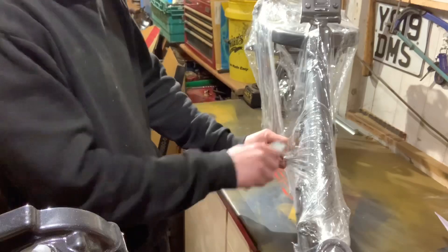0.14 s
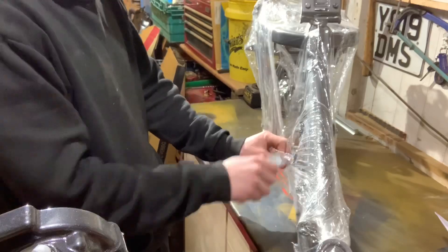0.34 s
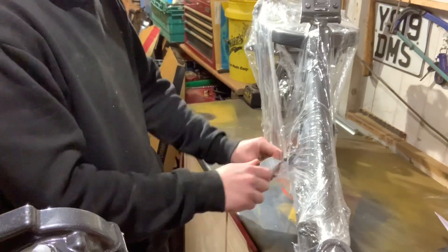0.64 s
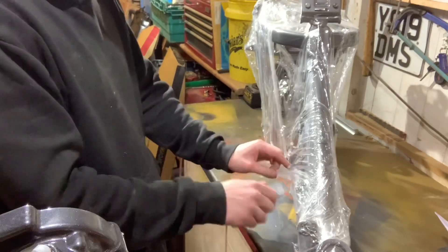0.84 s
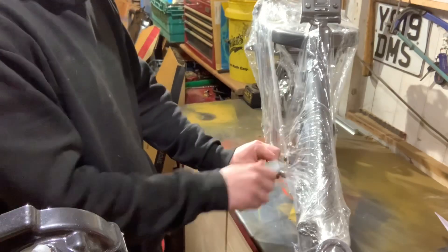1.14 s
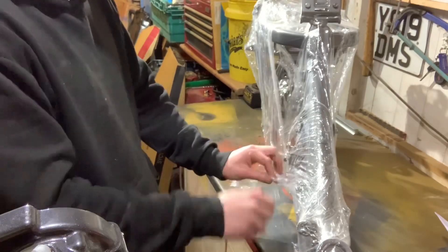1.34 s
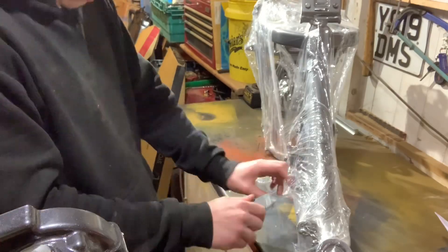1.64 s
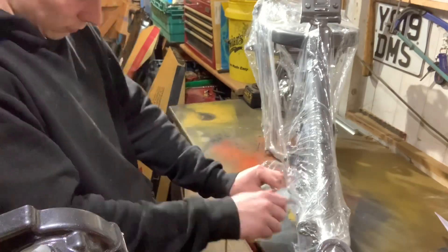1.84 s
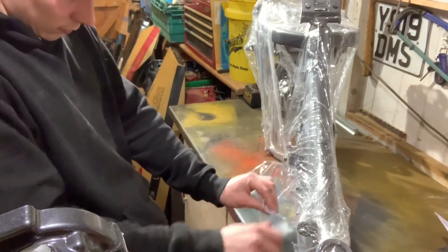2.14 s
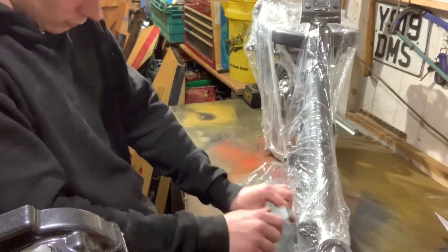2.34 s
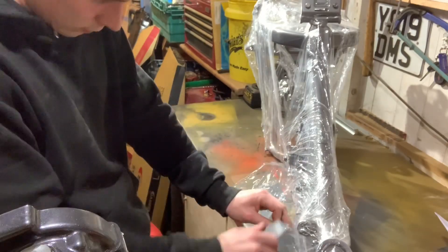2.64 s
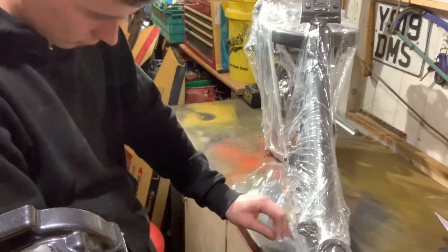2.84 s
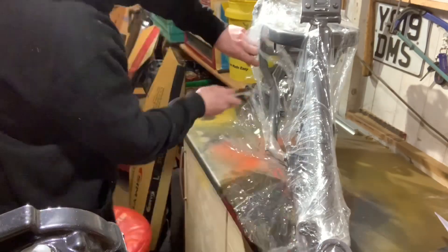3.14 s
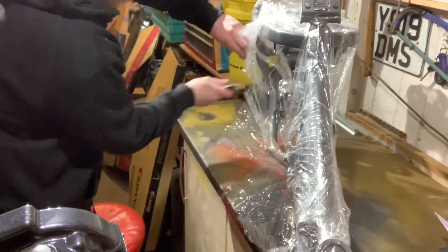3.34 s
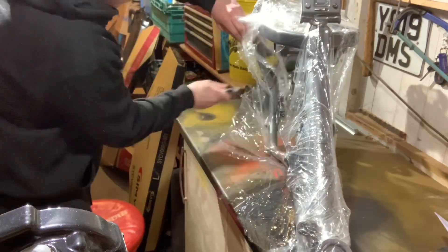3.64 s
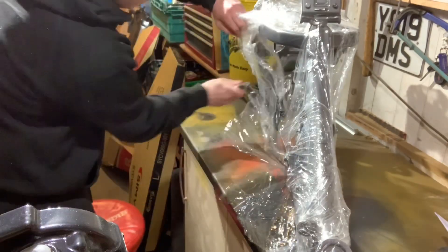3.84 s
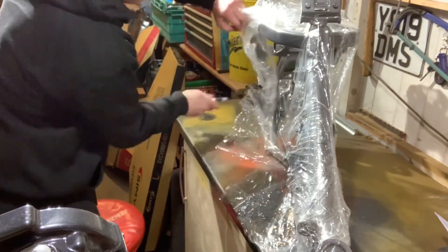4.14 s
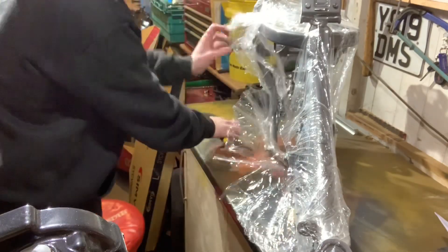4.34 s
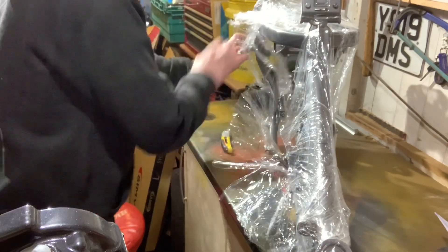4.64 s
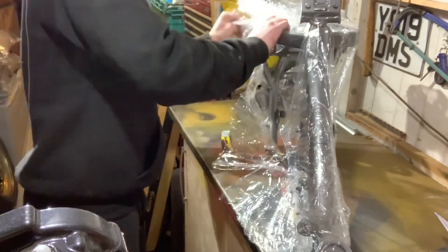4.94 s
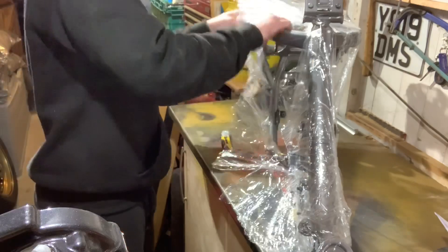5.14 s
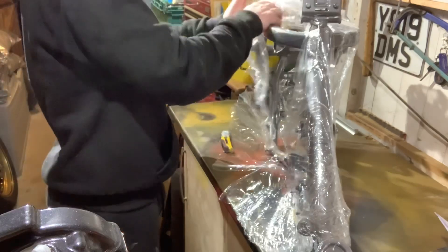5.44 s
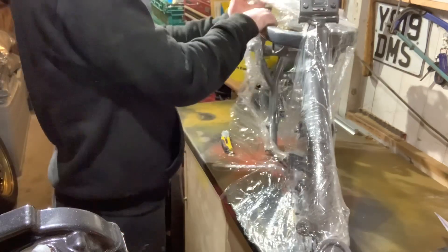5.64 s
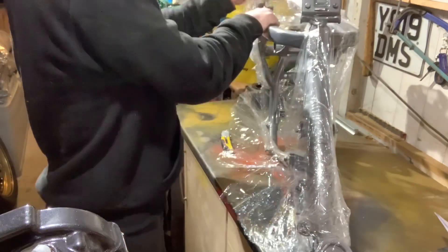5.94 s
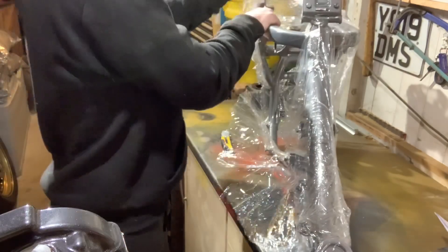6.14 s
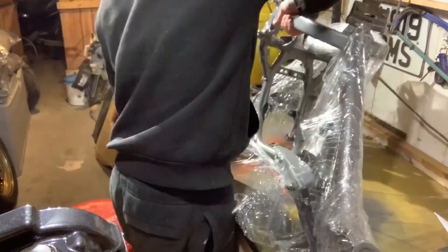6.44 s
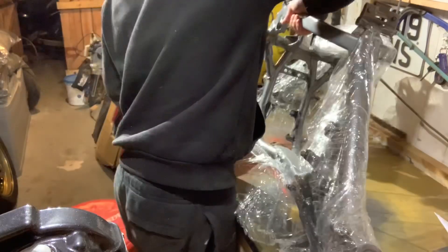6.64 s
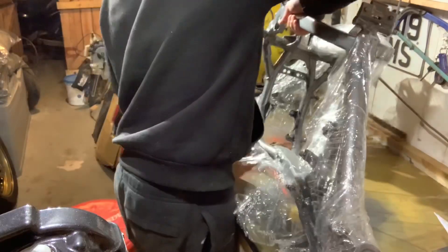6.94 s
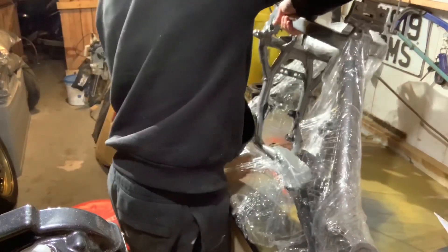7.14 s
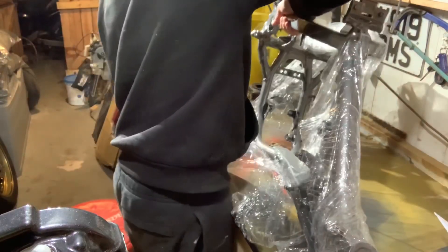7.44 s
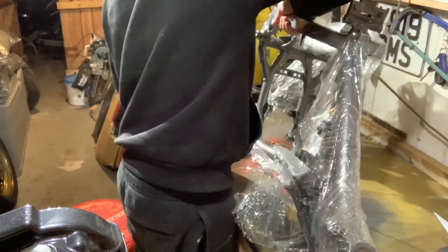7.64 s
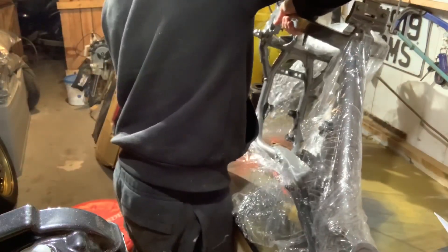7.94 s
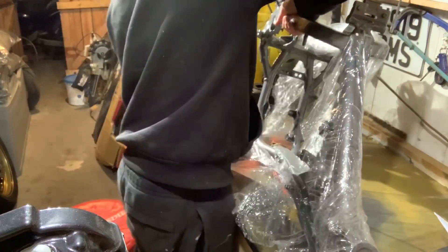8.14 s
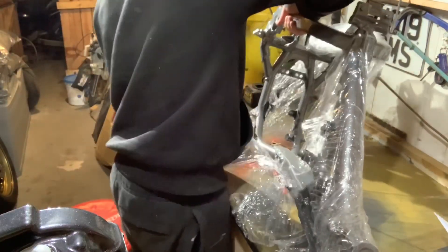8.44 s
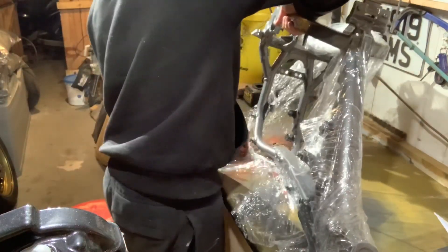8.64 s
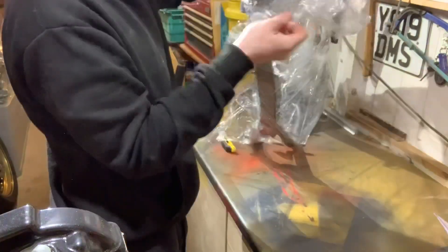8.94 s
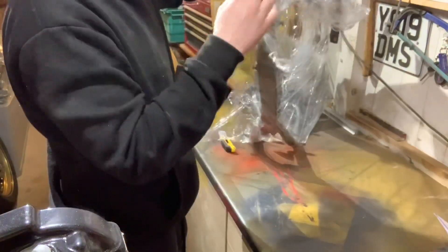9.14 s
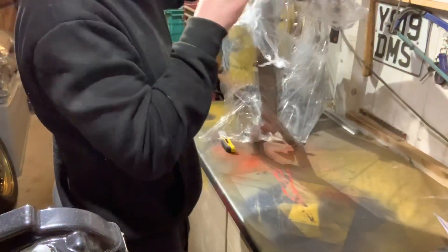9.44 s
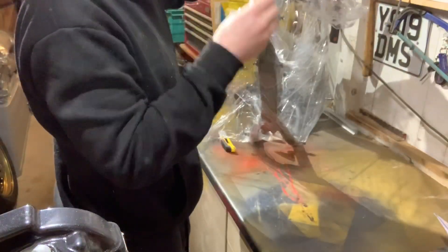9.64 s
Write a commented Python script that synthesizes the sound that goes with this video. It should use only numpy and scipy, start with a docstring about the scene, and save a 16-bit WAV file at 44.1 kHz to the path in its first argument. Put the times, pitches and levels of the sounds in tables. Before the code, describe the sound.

Plastic stretch film ticks and rips in short tugs, is popped six times by a blade, then peeled and crumpled, with one late knock.

```python
"""Stretch wrap is taken off a metal frame on a workshop bench. Short tugs first rip it in dense trains of
clicks; a knife then punctures the taut film six times, each a noise pop over a sinking membrane boom,
and is put down with a clack. Next the film is mostly peeled and crumpled, in hiss and crackle, thudding
like a slack drum, and late on one knock rings the frame as damped sines. Random paths scatter it all
off the bench and the walls of a small room."""
import sys
import numpy as np
from scipy import signal
from scipy.fft import rfft, irfft, next_fast_len
from scipy.io import wavfile
from scipy.ndimage import map_coordinates

SR = 44100
rng = np.random.default_rng(int(sys.argv[2]) if len(sys.argv) > 2 else 0)


def store_wav(level_fs):
    """Save 16-bit WAV to argv[1]."""
    pcm = np.round(np.clip(np.atleast_2d(level_fs), -1, 1) * 32767)
    wavfile.write(sys.argv[1], SR, pcm.T.astype(np.int16))


N = 431738

# All levels are relative settings within their own layer.
# Background and room tone spectrum: frequency_hz, level_db
AIR_SPECTRUM = [(30, -20.5), (110, 8), (300, -9), (900, -28), (15000, -48)]
# Reverberation of the small room: frequency_hz, t60_s
ROOM_DECAY = [(150, 0.23), (500, 0.13)]

# Spectrum of the knife handle on the bench: frequency_hz, level_db
KNIFE_SPECTRUM = [(400, 2), (750, -11.5), (2300, -1), (3500, -16.5), (15000, -30.5)]
KNIFE_S, KNIFE_DB = 4.4585, -24.5  # the knife is put down
# Ringing modes of the frame: frequency_hz, level_db, t60_s
FRAME_MODES = [(1910, -9, 0.066), (2070, 11, 0.012), (2230, -9, 0.067)]
KNOCK_S, KNOCK_DB = 8.5345, -17

# Soft thuds as the stretched sheet lets go: start_s, level_db
THUDS = [(0.715, -43), (0.866, -40), (1.685, -45), (3.767, -32.5), (4.821, -30.5), (5.173, -22),
         (5.248, -24.5), (5.362, -24.5), (5.421, -24.5), (5.587, -21), (5.684, -19), (6.026, -24),
         (6.162, -21.5), (6.831, -32.5), (7.358, -34), (7.874, -33)]
# Film squeaking under the blade or the fingers: start_s, length_s, pitch_hz, level_db
SQUEAKS = [(3.2, 0.098, 1190, -33), (3.306, 0.022, 1373, -31.5), (3.346, 0.064, 1160, -35.5),
           (6.114, 0.042, 1240, -39.5), (7.317, 0.033, 1487, -29.5)]
# Single creases snapping over: start_s, level_db
SNAPS = [(0.455, -27.5), (0.5377, -31.5), (0.562, -20.5), (1.446, -24.5), (1.796, -26.5), (2.665, -29),
         (3.397, -22.5), (4.3984, -40.5), (5.007, -17.5), (5.3345, -18), (5.3754, -19), (5.508, -24),
         (5.572, -17.5), (5.68, -16.5), (5.7872, -24.5), (6.308, -37), (6.469, -21.5), (6.519, -21),
         (6.626, -27), (6.6697, -23), (6.757, -32), (7.2342, -30), (7.324, -26), (7.34, -24), (7.874, -24),
         (8.037, -26.5), (8.366, -26), (8.4418, -36.5), (8.858, -24), (9.369, -27), (9.547, -27.5),
         (9.5797, -23)]
# Knife punctures: start_s, pop_db, drum_db, scrape_s (length of scrape before the pop), scrape_db
STABS = [(3.236, -15.5, -19, 0.013, -21.5), (3.416, -18.5, -15, 0.025, -31.5),
         (3.5649, -13.5, -14.5, 0.016, -28.5), (3.734, -21.5, -16.5, 0.019, -25),
         (3.907, -21, -17.5, 0.034, -26.5), (4.054, -18, -15.5, 0.031, -27)]
HUM_DB, HUM_T60 = -25.5, 0.33  # the sheet's hum after a boom; decay in s
# Tears: start_s, end_s, level_db, flutter_db (freed edge, re the tear)
RIPS = [(0, 0.057, -37.5, -7.5), (0.198, 0.256, -38, -10), (0.764, 0.791, -41, -13.5),
        (0.982, 1.043, -38, -7.5), (1.206, 1.272, -36, -8.5), (1.43, 1.484, -35, -7),
        (1.863, 1.905, -39, -12), (2.07, 2.143, -34.5, -11), (2.717, 2.77, -31, -20),
        (4.934, 4.965, -24.5, -16.5), (5.33, 5.395, -33, -13.5), (5.663, 5.71, -32.5, -10.5),
        (7.331, 7.368, -36.5, -4), (9.418, 9.445, -38.5, -39)]

# Light fingering between the tugs: time_s, pull_db
FINGERING = [(0.0, -70), (0.35, -67.5), (0.6, -59), (1.25, -54), (1.4, -66.5), (1.75, -58), (2.03, -65.5),
             (2.35, -55.5), (4.1, -49.5), (4.52, -70), (4.57, -44), (6.1, -43), (6.9, -51), (7.5, -51),
             (7.68, -63.5), (8.07, -45.5), (8.27, -63.5), (9.79, -49.5)]
# Tugs and handfuls that unstick the film: start_s, length_s, pull_db
TUGS = [(0.568, 0.051, -50), (0.724, 0.059, -49), (1.682, 0.057, -50.5), (1.806, 0.14, -51),
        (2.479, 0.071, -38.5), (2.682, 0.092, -44), (3.025, 0.025, -40), (3.198, 0.27, -46.5),
        (3.73, 0.076, -47.5), (4.65, 0.37, -34.5), (5.118, 0.036, -37), (5.245, 0.175, -33.5),
        (5.57, 0.21, -42.5), (5.744, 0.12, -39), (6.21, 0.13, -37), (6.44, 0.073, -40.5),
        (6.606, 0.26, -43), (7.015, 0.17, -50.5), (7.214, 0.036, -43.5), (7.339, 0.068, -43.5),
        (7.79, 0.14, -43), (8.33, 0.66, -47.5), (8.513, 0.079, -40), (8.843, 0.16, -37),
        (9.54, 0.14, -41.5)]
# The loose sheet is shaken and flaps: start_s, length_s, flutter_db
FLAPS = [(0.462, 0.0071, -41), (0.718, 0.12, -58), (7.865, 0.037, -46.5), (8.54, 0.22, -47.5),
         (8.945, 0.028, -45.5)]
ARCH_DB = 1.5  # a stroke is this much weaker at its ends than in its middle
GRIP_DB_PER_S, RELEASE_DB_PER_S = 554, 356  # how fast a stroke takes hold and lets go
# Instants when slack film almost stops crackling: time_s
SLACKS = [3.136, 4.44, 5.052, 5.462, 6.336, 6.9, 8.821]
SLACK_S, SLACK_DB = 0.012, -20  # Gaussian half length and depth of such a lull
# How much the film is bunched up: time_s, level_db (coarse crackle re pull)
BUNCHING = [(0.0, -3.5), (3.3, -6), (4.7, -10), (5.8, -11.5), (6.6, 0), (7.9, -2.5), (8.71, -4),
            (9.79, -11.5)]
FLUTTER_DB = -19  # flutter that goes with any pull, re the pull
PEEL_DB = -36.5  # pull at which crackling and even peel share equally

# Spectra of the film's sounds, each: frequency_hz, level_db
# sharp crack of a crease or tear
CRACK = [(150, -16), (500, -7), (720, -14.5), (1000, -10), (1250, -2.5), (2900, -0.5), (3400, -5),
         (4700, -4.5), (15500, -9.5)]
# puncture of taut film
POP = [(740, -7.5), (1000, -1.5), (2700, 0), (15500, -12)]
# fine unsticking
SIZZLE = [(300, -28), (900, -10), (3300, 2), (15500, -0.5)]
# even peeling
PEEL = [(550, -3), (730, -8.5), (900, -1.5), (15500, 2)]
# coarse folds
CRUMPLE = [(900, -34), (1350, -4.5), (1650, -6.5), (2050, 0), (2750, -7.5), (3400, -15.5), (7000, -34.5)]
# flapping sheet or edge
FLUTTER = [(50, -25.5), (150, -2.5), (250, -7), (340, 3), (420, -4.5), (510, 1), (720, -15), (1500, -51)]
# low movement of the whole sheet
SWAY = [(45, -35), (100, 0), (135, 3), (190, -7), (500, -32.5)]
TOP_HZ = 16050  # upper band limit of the output


def amp(db):
    """Level to amplitude: 20 dB is a factor of ten."""
    return 10 ** (np.asarray(db) / 20)


def unit(x):
    """Normalisation of power: x at rms 1."""
    return x / np.sqrt(np.mean(x ** 2) + 1e-20)


def along(points, hz):
    """Interpolation of a frequency curve on a logarithmic axis."""
    f, v = np.transpose(points)
    return np.interp(np.log(hz + 1), np.log(f), v)


def gains(rows):
    """Envelopes linear in decibels: one gain per sample for each dB column, -120 dB outside the rows."""
    s, *cols = np.transpose(rows)
    t = np.arange(N) / SR
    return [amp(np.interp(t, s, c, -120, -120)) for c in cols]


def wobble(rate):
    """Slow random modulation: random knots, rate per second, joined by straight lines at rms 1."""
    knots = rng.standard_normal(int(N * rate / SR) + 4)
    return unit(map_coordinates(knots, [np.arange(N) * rate / SR], order=1))


def add(track, s, sound):
    """Superposition: mix a sound into a track from time s."""
    part = track[..., round(s * SR):][..., :sound.shape[-1]]
    part += sound[..., :part.shape[-1]]


def colour(x, spectrum, size=4096):
    """Minimum-phase filtering: a causal kernel of unit energy with the given spectrum."""
    hz = np.fft.rfftfreq(size, 1 / SR)
    cepstrum = irfft(np.log(amp(along(spectrum, hz))))
    # folding the cepstrum onto positive times makes the kernel causal
    cepstrum[1:size // 2] *= 2
    cepstrum[size // 2 + 1:] = 0
    kernel = irfft(np.exp(rfft(cepstrum)))
    return signal.oaconvolve(x, kernel / np.linalg.norm(kernel))[:N]


def creases(rate, spread_db, clump_db, clump_rate):
    """Crackling noise: random clicks, rate per second, of uneven size with clumped levels, rms 1."""
    fires = rng.random(N) < rate / SR
    spread = spread_db * np.clip(rng.standard_normal(N), -2, 2)
    size_db = spread + clump_db * wobble(clump_rate)
    sign = np.sign(rng.standard_normal(N))
    return unit(fires * sign * amp(size_db))


def burst(t60, rise=0.00038):
    """Impulsive noise: a fast exponential rise (s) and decay (t60 in s), cut at 0.1 s."""
    t = np.arange(SR // 10) / SR
    return rng.standard_normal(len(t)) * amp(-60 * t / t60) * (1 - np.exp(-t / rise))


def drum(rest_hz, tight_hz, relax, swell, second_db):
    """Membrane modes: two pitches sink, differently each time, as tension relaxes; the lower hums on."""
    t = np.arange(SR // 5) / SR
    tension = np.exp(-t / relax + 0.12 * rng.standard_normal())
    hz = rest_hz + (tight_hz - rest_hz) * tension
    phase = 2 * np.pi * np.cumsum(hz) / SR
    first = np.sin(phase)
    second = amp(second_db) * np.sin(1.59 * phase + 2 * np.pi * rng.random())
    boom = (first + second) * t / swell * np.exp(1 - t / swell)
    hum = amp(HUM_DB - 60 * t / HUM_T60) * first
    return boom + hum


def strokes(rows):
    """Envelope of hand force: each stroke takes hold, arches and lets go; overlaps add in power."""
    t = np.arange(N) / SR
    power = np.zeros(N)
    for start, length, db in rows:
        first = max(round(start * SR) - SR // 8, 0)
        near = slice(first, round((start + length) * SR) + SR // 4)
        age = t[near] - start
        arch = (2 * np.clip(age / length, 0, 1) - 1) ** 2
        grip = GRIP_DB_PER_S * np.maximum(-age, 0)
        release = RELEASE_DB_PER_S * np.maximum(age - length, 0)
        power[near] += amp(db - ARCH_DB * arch - grip - release) ** 2
    return np.sqrt(power)


def stillness():
    """Loss of tension: the gain of the pull dips wherever the film goes slack."""
    t = np.arange(N) / SR
    lulls = sum(np.exp(-((t - s) / SLACK_S) ** 2) for s in SLACKS)
    return amp(SLACK_DB * lulls)


def air():
    """Ambient noise: low-weighted noise, partly shared and partly separate in the two channels."""
    shared, left, right = [colour(rng.standard_normal(N), AIR_SPECTRUM) for _ in range(3)]
    return amp(-69.0) * (shared + .5 * np.array([left, right]))


def paths(scatter_db, room_db, scatter_t60=0.055, mono_hz=600, lag=0.000426):
    """Impulse response at two microphones: direct sound, film and bench scatter, room tail; alike in bass."""
    hz, t, z = signal.stft(rng.standard_normal((2, SR // 5)), SR, nperseg=256)
    decay = amp(-60 * t / along(ROOM_DECAY, hz)[:, None])
    tail = signal.istft(z * decay, SR, nperseg=256)[1]
    t = np.arange(tail.shape[1]) / SR
    scatter = rng.standard_normal(tail.shape) * amp(-60 * t / scatter_t60)
    h = (amp(scatter_db) * unit(scatter) + amp(room_db) * unit(tail)) / np.sqrt(len(t))
    h[[0, 1], rng.integers(0, 20, 2)] += 1  # direct sound, within 20 samples
    both = rfft(h / np.linalg.norm(h[0]))
    hz = np.fft.rfftfreq(len(t), 1 / SR)
    alike = 1 / (1 + (hz / mono_hz) ** 4)
    both[0] = alike * both[1] + np.sqrt(1 - alike ** 2) * both[0]
    both[1] *= np.exp(-2j * np.pi * hz * lag)  # the right microphone is reached lag seconds later
    return irfft(both) * np.cos(np.pi / 2 * t / t[-1]) ** 2  # the tail fades out fully


def workshop(x, scatter_db, room_db, count):
    """Time-varying propagation: as the film moves, about count sets of paths fade into one another."""
    out, size = np.zeros((2, N + 2 * SR)), N // count
    x = np.pad(x, (size, 2 * size))
    for i in range(0, N + size, size):
        piece = x[i:i + 2 * size] * np.hanning(2 * size) ** .75
        add(out, i / SR, signal.fftconvolve(piece[None], paths(scatter_db, room_db), axes=1))
    return out[:, size:size + N]


def knife_down():
    """Damped impact: the knife's handle meets the bench with a short, dull clack."""
    clack = np.zeros(N)
    add(clack, KNIFE_S, amp(KNIFE_DB) * burst(t60=0.062))
    return colour(clack, KNIFE_SPECTRUM)


def knock():
    """Modal ringing: one hard contact excites decaying sines of the frame, damped by its wrapping."""
    t = np.arange(SR // 4) / SR
    ring, crack = np.zeros((2, N))
    contact = 1 - np.exp(-t / 0.00045)  # the wrapping softens the blow
    modes = sum(amp(db - 60 * t / t60) * np.sin(2 * np.pi * hz * t) for hz, db, t60 in FRAME_MODES)
    add(ring, KNOCK_S, amp(KNOCK_DB) * contact * modes)
    add(crack, KNOCK_S - .0012, amp(KNOCK_DB - 3.5) * burst(t60=0.088, rise=0.0012))
    return ring + colour(crack, SIZZLE)


def thuds():
    """Slack membrane: weaker tension starts the boom lower and it dies more slowly, with a shudder."""
    booms, shudder = np.zeros((2, N))
    for s, db in THUDS:
        boom = drum(rest_hz=123.6, tight_hz=169, relax=0.011, swell=0.0092, second_db=-19.5)
        add(booms, s, amp(db - 6.5) * boom)
        add(shudder, s, amp(db - 14) * burst(t60=0.3))
    return booms + colour(shudder, SWAY)


def squeaks(jitter=0.082):
    """Stick-slip friction: the film squeaks as a sine of unsteady pitch that swells and fades."""
    out, waver = np.zeros(N), wobble(900)
    for s, length, hz, db in SQUEAKS:
        pitch = hz * (1 + jitter * waver[round(s * SR):round((s + length) * SR)])
        tone = np.sin(2 * np.pi * np.cumsum(pitch) / SR)
        add(out, s, amp(db) * tone * np.sqrt(np.hanning(len(pitch))))
    return out


def snaps(pull, bunch):
    """Buckling: a crease flips with a dry tick, coarser in bunched film; chance ones follow the pull."""
    ticks = np.zeros(N)
    for s, db in SNAPS:
        add(ticks, s, amp(db) * burst(t60=0.027))
    chance = creases(rate=55, spread_db=3, clump_db=1, clump_rate=20)
    stray = amp(-1.5) * pull * np.sqrt(bunch) * chance
    return colour(ticks + stray, CRACK) + amp(-1.5) * colour(ticks * bunch, CRUMPLE)


def stabs():
    """Release of tension: the blade scrapes in, film pops, and the taut sheet slaps and booms as it slackens."""
    pops, slaps, booms = np.zeros((3, N))
    for s, pop_db, drum_db, lead, scrape_db in STABS:
        pressure = np.linspace(.3, 1, round(lead * SR))
        add(pops, s - lead, amp(scrape_db) * pressure * rng.standard_normal(len(pressure)))
        add(pops, s, amp(pop_db + 9.5) * burst(t60=0.018))
        add(slaps, s, amp(drum_db - 4.5) * burst(t60=0.056, rise=0.002))
        boom = drum(rest_hz=114.7, tight_hz=400.5, relax=0.0047, swell=0.004, second_db=-11.5)
        add(booms, s + 0.0018, amp(drum_db - 1.5) * boom)
    return colour(pops, POP), booms + colour(slaps, FLUTTER) + colour(slaps, SWAY)


def rips(edge_db=-6, fade=0.0044, jerk_db=1.8):
    """Fracture in jerks: a tear swells and fades as a dense train of clicks while its freed edge flutters."""
    t = np.arange(N) / SR
    tear, edge = np.zeros((2, N))
    end_gain = amp(edge_db)
    for start, end, db, flutter_db in RIPS:
        times = [start - fade, start, (start + end) / 2, end, end + 2 * fade]
        run = np.interp(t, times, [0, end_gain, 1, end_gain, 0])
        tear += amp(db) * run
        edge += amp(db + flutter_db) * run
    tear *= amp(jerk_db * wobble(110))
    clicks = creases(rate=3500, spread_db=2.5, clump_db=1.0, clump_rate=250)
    tearing = colour(amp(4.0) * tear * clicks, CRACK)
    return tearing + colour(amp(3.0) * edge * rng.standard_normal(N), FLUTTER)


def handling(pull, bunch):
    """Adhesive release: fine clicks merge into wide hiss under hard pull; bunched film crackles, flaps and sways."""
    merged = np.arctan(pull / amp(PEEL_DB))  # angle of a constant-power crossfade
    clicks = creases(rate=2400, spread_db=1, clump_db=2.5, clump_rate=150)
    sizzle = colour(amp(2.5) * pull * np.cos(merged) * clicks, SIZZLE)
    # independent noise in each channel makes the peel wide
    peel_gain = amp(-0.1) * pull * np.sin(merged)
    peel = np.array([colour(peel_gain * noise, PEEL) for noise in rng.standard_normal((2, N))])
    folds = creases(rate=380, spread_db=5, clump_db=3.2, clump_rate=70)
    crackle = colour(pull * bunch * folds, CRUMPLE)
    flap = np.hypot(amp(FLUTTER_DB) * pull, strokes(FLAPS))
    flutter = colour(flap * creases(rate=490, spread_db=5, clump_db=3, clump_rate=62), FLUTTER)
    sway = colour(amp(-12.5) * pull * bunch * rng.standard_normal(N), SWAY)
    return sizzle, peel, crackle + flutter, sway


def scene():
    """Direct and scattered fields: crackle scatters widely, booms lean right, the knock is also heard direct."""
    (fingering,), (bunch,) = gains(FINGERING), gains(BUNCHING)
    pull = np.hypot(fingering, strokes(TUGS)) * stillness()
    sizzle, peel, crackle, sway = handling(pull, bunch)
    pops, booms = stabs()
    frame = knock()
    film = peel + workshop(sizzle, scatter_db=4.5, room_db=-7.0, count=120)
    film += workshop(crackle + rips() + squeaks(), scatter_db=2.5, room_db=-5.5, count=100)
    impacts = pops + snaps(pull, bunch) + knife_down() + frame
    hits = workshop(impacts, scatter_db=-2.5, room_db=-6.0, count=20)
    bass = workshop(booms + thuds() + sway, scatter_db=-10.0, room_db=-14.0, count=10)
    # left and right levels in dB
    film = film * amp([[.5], [-.5]])
    bass = bass * amp([[-2.8], [1.8]])
    return film + hits + frame + bass + air()


def record(dry):
    """Band limiting: a high-pass cuts the deepest bass and a sharp low-pass keeps nothing above TOP_HZ."""
    highpass = signal.butter(3, 58, "highpass", fs=SR, output="sos")
    dry = signal.sosfilt(highpass, dry)
    m = next_fast_len(N + SR // 2)
    passband = np.fft.rfftfreq(m, 1 / SR) < TOP_HZ
    return irfft(rfft(dry, m) * passband, m)[:, :N]


dry = scene()
out = record(dry)
store_wav(out)
```